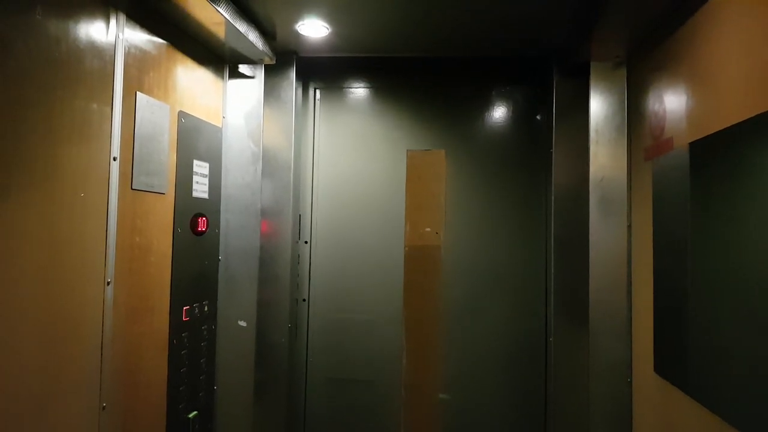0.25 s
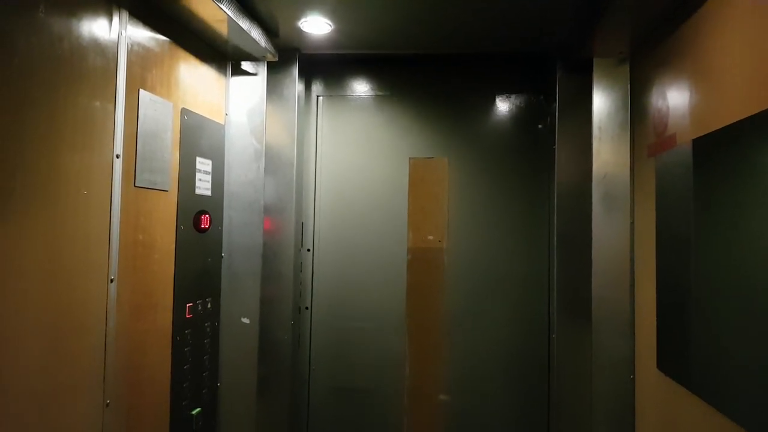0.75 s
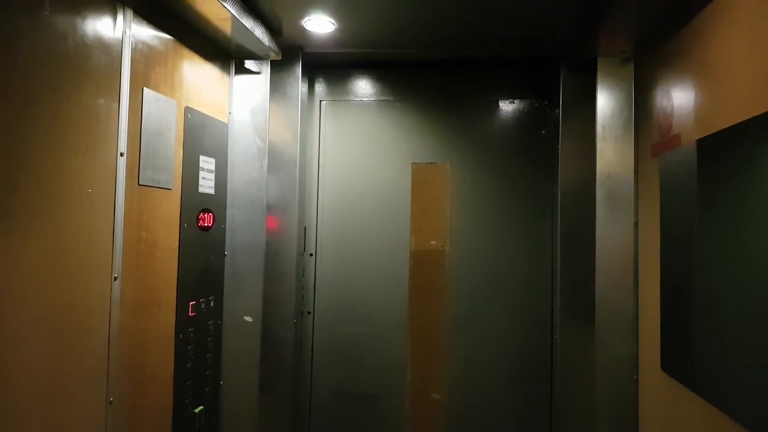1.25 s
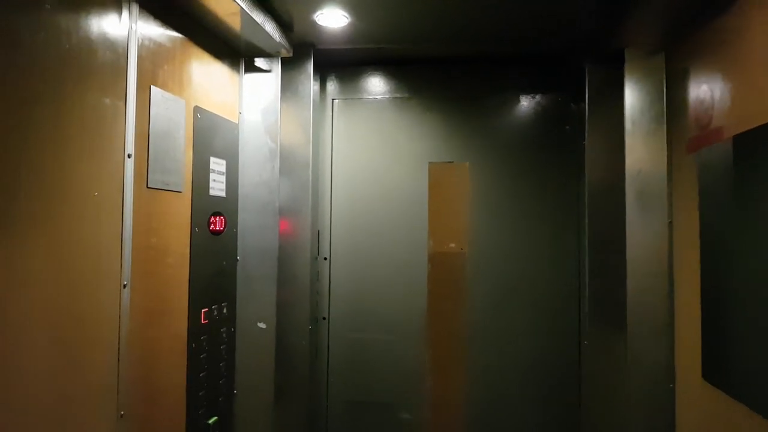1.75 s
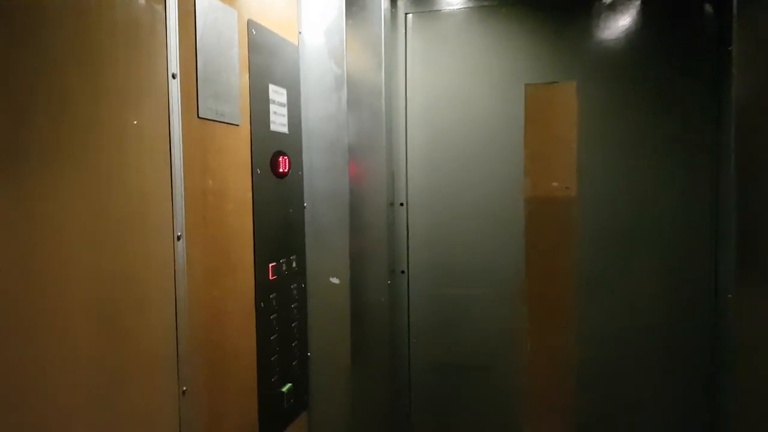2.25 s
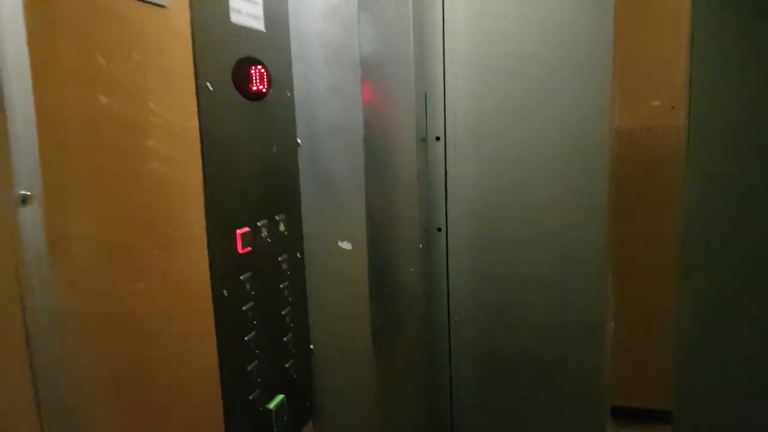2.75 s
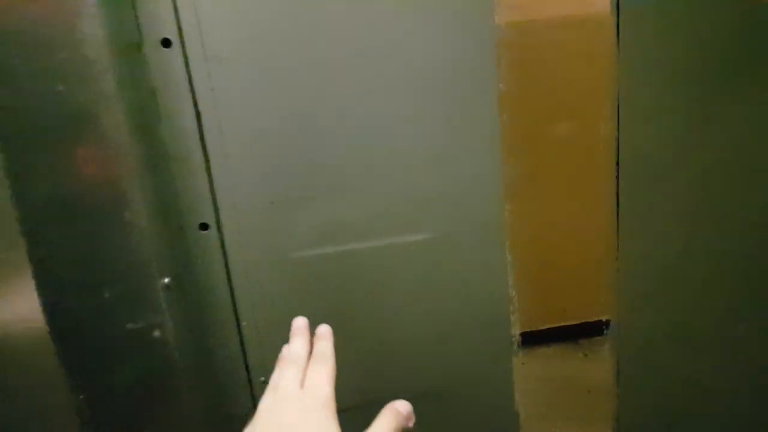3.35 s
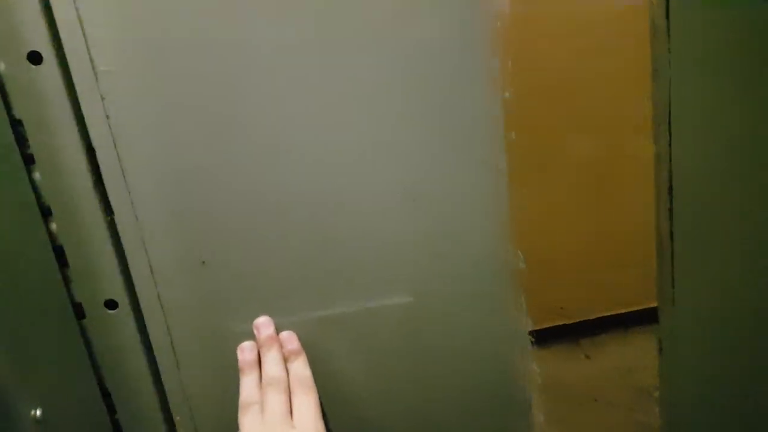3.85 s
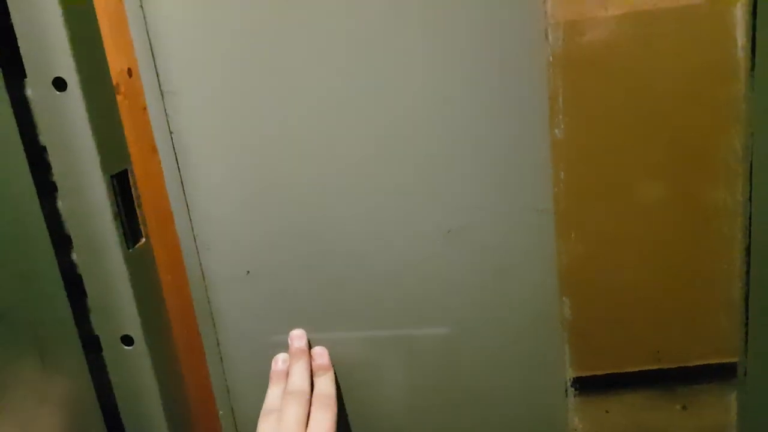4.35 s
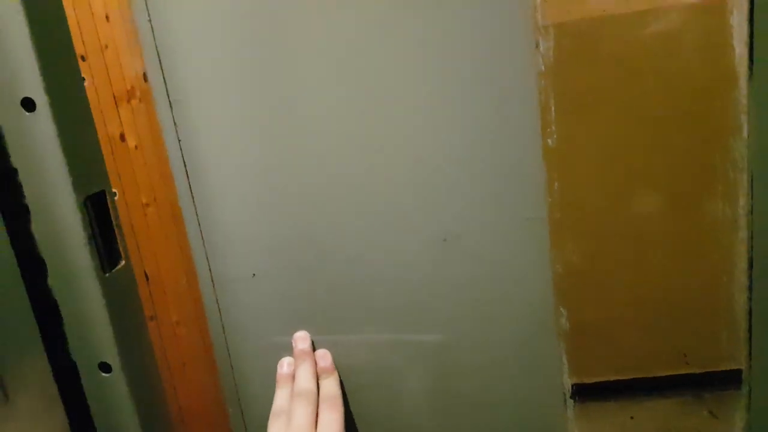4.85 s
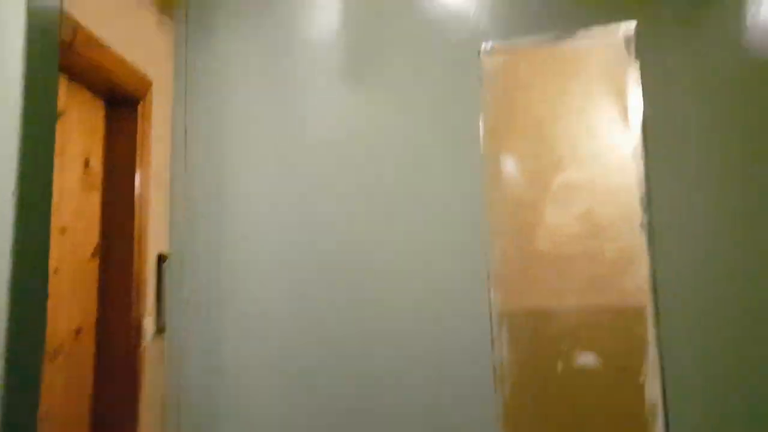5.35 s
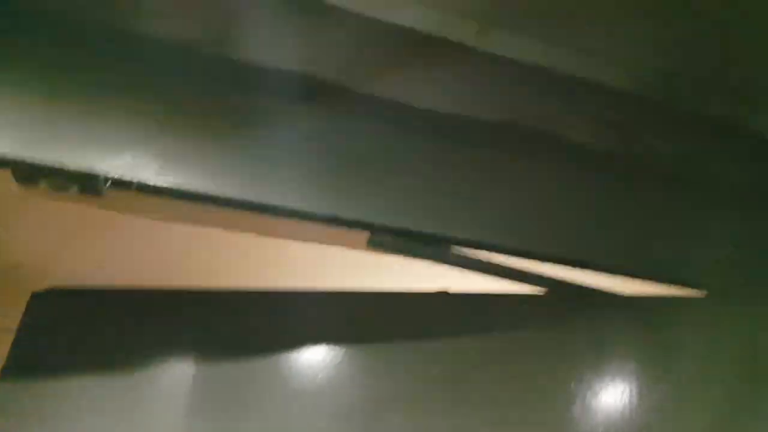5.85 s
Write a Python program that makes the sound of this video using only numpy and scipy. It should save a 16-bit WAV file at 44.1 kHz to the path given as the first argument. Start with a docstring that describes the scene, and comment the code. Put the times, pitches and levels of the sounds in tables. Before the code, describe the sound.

Heavy steps thud and shake loose lift panels, soles squeak, then a pushed steel door snaps off its latch with a hollow boom.

```python
"""The loose floor of an old lift cabin clunks under someone's steps and sets the wall panels rattling.
Soles scuff by stick and slip, and a jacket rustles as friction noise that follows the body's speed.
A hand pushes the steel swing door: its latch clicks and snaps free, the leaf booms in its plate modes,
and the hinges moan as narrow resonances. Under it all lies filtered noise: the low hum of the shaft."""
import sys
import numpy as np
from scipy import signal
from scipy.fft import rfft, irfft, next_fast_len
from scipy.io import wavfile

SR = 44100
rng = np.random.default_rng(int(sys.argv[2]) if len(sys.argv) > 2 else 0)


def to_wav(s):
    """Save 16-bit WAV."""
    ch = np.atleast_2d(s).T  # columns
    pcm = np.round(np.clip(ch, -1, 1) * 32767)  # PCM
    wavfile.write(sys.argv[1], SR, pcm.astype(np.int16))


N = 268745
TIME = np.arange(N) / SR  # s, the whole scene
TAIL = TIME[:65536]  # s, the span of one event


def amp(db):
    """Decibel law: level in dB to amplitude gain."""
    return 10 ** (np.asarray(db) / 20)


def unit(x):
    """Power normalisation: scales to rms 1."""
    return x / np.sqrt(np.mean(x ** 2) + 1e-20)


def read(points, hz):
    """Logarithmic pitch scale: interpolates a spectrum's value over log frequency."""
    f, value = np.transpose(points)
    return np.interp(np.log(hz + 1), np.log(f), value)


def level(rows):
    """Slow amplitude modulation: a dB curve over time as a gain for every sample."""
    s, db = np.transpose(rows)
    return amp(np.interp(TIME, s, db))


def add(mix, s, sound):
    """Superposition: adds a stereo sound to the mix from time s."""
    part = mix[:, max(round(s * SR), 0):][:, :sound.shape[1]]
    part += sound[:, :part.shape[1]]


def tilt(hz, slope_db):
    """Spectral slope: gain that leans by slope_db an octave about 300 Hz."""
    return amp(slope_db * np.log2(np.clip(hz, 60, 8000) / 300))


# stereo width of the field: (frequency [Hz], side over mid [dB])
SIDE_OVER_MID = [(30, -16), (70, -35), (140, -11), (280, -11.5), (550, -7.5), (1000, -1.5), (2000, 0.5),
                 (16000, 0)]
RUMBLE_HZ = 23.6  # the cabin leaks below this


def noise(size, shape, ripple_db=2.5):
    """Diffuse field: random-phase noise of gain shape(hz), nearly the same on both sides in most of the bass."""
    hz = np.fft.rfftfreq(size, 1 / SR)
    # standing waves in the small cabin ripple the response above the bass
    bumps = np.interp(hz, np.arange(1000) * 25, rng.standard_normal(1000))
    ripple = amp(ripple_db * np.clip(hz / 700, 0, 1) * bumps)
    leak = hz / np.hypot(hz, RUMBLE_HZ)
    phases = 2 * np.pi * rng.random((2, len(hz)))
    mid, side = np.exp(1j * phases) * shape(hz) * ripple * leak
    mid = irfft(mid, size)
    side = irfft(side * amp(read(SIDE_OVER_MID, hz)), size)
    return np.array([mid + side, mid - side]) / np.std(mid)


def coloured(size, spectrum, slope_db=0):
    """Spectral shaping: noise with a given spectrum and slope."""
    return noise(size, lambda hz: amp(read(spectrum, hz)) * tilt(hz, slope_db))


def resonant(size, peaks):
    """Resonance: noise held in a few narrow peaks (frequency [Hz], width [Hz], level [dB])."""
    def shape(hz):
        return sum(amp(db) / (1 + (2 * (hz - f) / width) ** 2) for f, width, db in peaks)
    return noise(size, shape)


def onset(rise):
    """Finite contact time: a quarter-sine start lasting rise seconds."""
    return np.sin(np.pi / 2 * np.minimum(TAIL / max(rise, 1e-4), 1))


def chatter(size, depth_db, per_s):
    """Random contact: the uneven gain of many small touches, per_s of them a second."""
    knots = rng.standard_normal(size)
    return unit(amp(depth_db * np.interp(np.arange(size) * per_s / SR, np.arange(size), knots)))


# decay in the cabin: (frequency [Hz], t60 at ring factor 1 [s])
CABIN_T60 = [(40, 0.69), (90, 0.73), (200, 0.69), (500, 0.45), (1500, 0.3), (4000, 0.35), (8000, 0.25),
             (15000, 0.16)]


def strike(spectrum, slope_db, ring, late_db):
    """Dense modal decay: each band of a blow dies at its own speed, and the shaft answers late."""
    hz, t, bands = signal.stft(coloured(len(TAIL), spectrum, slope_db), SR, nperseg=512)
    t60 = read(CABIN_T60, hz)[:, None] * max(ring, .05)
    early, late = amp(-60 * t / t60), amp(late_db - 60 * t / (t60 * 2.86))
    return signal.istft(bands * np.hypot(early, late), SR, nperseg=512)[1][:, :len(TAIL)]


def modes(table, slope_db=0, ring=1):
    """Modal synthesis: decaying sines, the two sides out of step most at high frequency."""
    out = np.zeros((2, len(TAIL)))
    for hz, db, t60 in table:
        side_sign = rng.choice([-1, 1]) * np.array([[1], [-1]])
        apart = np.arctan(amp(read(SIDE_OVER_MID, hz))) * side_sign
        phase = 2 * np.pi * (hz * TAIL + rng.random())
        decay = amp(db - 60 * TAIL / (t60 * ring))
        out += tilt(hz, slope_db) * decay * np.sin(phase + apart)
    return out


# weight landing on the cabin floor:
# (time [s], level [dB], rise [s], brightness [dB per octave], factor on the ring time)
FLOOR_STEPS = [(0.647, -51.5, 0.011, -15, 0.96), (1.497, -30, 0.042, -0.5, 0.91),
               (1.675, -25.5, 0.02, 4.5, 1.27), (1.931, -36.5, .016, -1, 1.4),
               (2.337, -31.5, .007, -9.5, 0.68), (2.452, -38, 0.0076, -0.5, 1.14),
               (2.705, -35, 0.0054, -4.5, 0.71), (3.015, -32, 0.0093, 0, 1.75),
               (3.335, -34, 0.0037, -8, 1.24), (3.72, -40, 0.043, -1.5, 1.4), (3.95, -31, .066, 1.5, 1.67),
               (5.039, -52.5, 0.035, 2.5, 1.4), (5.279, -50.5, .03, -5, 1.7)]
# spectrum of the thump: (frequency [Hz], level [dB])
THUMP_SPECTRUM = [(25, 1.5), (40, -4), (60, -4), (85, -2), (115, -12), (165, -9.5), (230, -17),
                  (400, -26.5), (800, -39.5), (2000, -45.5), (8000, -67)]
# the floor's modes: (frequency [Hz], level [dB], t60 at ring factor 1 [s])
FLOOR_MODES = [(38.5, -15, 0.99), (71.9, -10, .9), (86.6, -2, 1), (137.4, -8.5, 0.59)]


def floor_thuds():
    """Impact on a spring: the floor takes each step with a dull thump and rings on in its low modes."""
    out = np.zeros((2, N))
    for s, db, rise, slope_db, ring in FLOOR_STEPS:
        thump = strike(THUMP_SPECTRUM, slope_db, ring, late_db=-23)
        add(out, s, amp(db) * onset(rise) * (thump + modes(FLOOR_MODES, 0, ring)))
    return out


# knocks on the cabin panels:
# (time [s], level [dB], rise [s], brightness [dB per octave], factor on the ring time)
PANEL_KNOCKS = [(1.499, -47, 0.0013, -0.5, 1), (1.713, -18, 0.0081, 0.5, 1.08),
                (1.744, -20.5, 0.0024, 0, 0.61), (1.763, -25, 0.0032, 1.5, 0.77),
                (1.886, -35.5, .005, -0.5, 0.43), (2.525, -42.5, 0.0044, -3, .5),
                (2.71, -47.5, 0.0054, 1, 0.47), (3.016, -41.5, 0.0034, 1.5, 1.3),
                (3.347, -40, 0.003, 0.5, 0.8), (3.465, -49.5, 0.0059, 1.5, 0.79),
                (5.21, -46, 0.014, -0.5, 0.66)]
# spectrum of the rattle: (frequency [Hz], level [dB])
RATTLE_SPECTRUM = [(25, -20), (70, -0.5), (135, -4), (210, -15.5), (285, -7.5), (385, -11), (600, -15),
                   (950, -14.5), (1600, -21.5), (2400, -19), (4000, -29.5), (5500, -29), (8500, -32),
                   (10500, -40), (16000, -52)]
# panel resonances: (frequency [Hz], level [dB], t60 at ring factor 1 [s])
PANEL_MODES = [(72.7, -10, 0.8), (133, -11.5, 0.42), (158.2, -18, 0.6), (178.4, -11.5, 0.7),
               (229, -17.5, 1.65), (248.8, -16, 1.67), (289, -6.5, 0.56), (317, -14, 0.46),
               (379, 0.5, 0.26), (395.4, -2, 0.33), (471, -19, 0.63), (487, -7, 0.61), (558.4, -10, 0.57),
               (693, -16, 0.62), (846, -10, 0.42), (895, -17, 0.42), (982, -10, 0.39), (1042, -7.5, 0.28),
               (1188, -20, 0.7), (1240, -15, 0.53), (1310, -12.5, 0.35), (2170, -8, 0.3), (2720, -30, 0.3),
               (2895, -17, 0.48)]


def cabin_clunks():
    """Plate vibration: loose panels ring and chatter against their frames."""
    out = np.zeros((2, N))
    for s, db, rise, slope_db, ring in PANEL_KNOCKS:
        rattle = strike(RATTLE_SPECTRUM, slope_db, ring, late_db=-12.0)
        rattle = rattle * chatter(len(TAIL), depth_db=1.16, per_s=220)
        # the modes stand out less in strongly tilted knocks
        ringing = amp(-0.5 - 2 * abs(slope_db)) * modes(PANEL_MODES, 0, ring)
        add(out, s, amp(db) * onset(rise) * (rattle + ringing))
    return out


# soles dragging on the floor: (time [s], level [dB], swell [s], t60 [s],
# brightness [dB per octave], squeak level [dB], squeak frequency [Hz])
SOLE_DRAGS = [(1.684, -32, 0.018, 0.33, 2, -20, 2570), (2.336, -39, 0.012, 0.34, 1, -3.5, 2410),
              (2.355, -36, 0.051, 0.3, -1, -10.5, 2400), (2.917, -53, 0.022, 0.48, -2.5, -16, 2530),
              (3.017, -37.5, 0.0099, 0.41, -2, -27, 2330), (3.032, -32, 0.043, 0.37, 1, -6.5, 2100),
              (3.166, -46, 0.012, 0.17, -7, -2, 2360), (3.315, -39.5, 0.005, 0.2, 5.5, -11, 2440),
              (5.26, -51.5, 0.027, 0.18, -4, -20, 2400)]
# spectrum of the gritty friction: (frequency [Hz], level [dB])
SOLE_SPECTRUM = [(100, -14), (600, -6), (1500, -5.5), (2200, 1), (3100, -0.5), (4200, -3), (5500, -6),
                 (8000, -13), (10000, -17), (14000, -11), (16000, -16)]


def scuffs():
    """Stick-slip friction: a sole drags in uneven jerks of fine grains, with a short rough squeak."""
    out = np.zeros((2, N))
    for s, db, swell, t60, slope_db, squeak_db, hz in SOLE_DRAGS:
        grit = coloured(len(TAIL), SOLE_SPECTRUM, slope_db)
        squeak = amp(squeak_db) * resonant(len(TAIL), [(hz, 120, 0), (hz * 1.105, 160, -6)])
        jerks = chatter(len(TAIL), depth_db=0.6, per_s=144)
        decay = amp(db - 60 * np.maximum(TAIL - swell, 0) / t60)
        add(out, s, decay * onset(swell) * jerks * (grit + squeak))
    return out


# light hollow knocks: (time [s], level [dB], factor on the ring time)
HOLLOW_KNOCKS = [(3.212, -31.5, 0.37), (3.249, -37.5, 0.19), (3.348, -37, 0.45)]
# their spectrum: (frequency [Hz], level [dB])
HOLLOW_SPECTRUM = [(100, 9), (380, -4), (520, 5), (930, -3), (1250, -13), (1870, -1.5), (2300, -11),
                   (3000, -22), (8000, -34), (16000, -45)]


def knocks():
    """Damped impact: short hollow knocks in the cabin."""
    out = np.zeros((2, N))
    for s, db, ring in HOLLOW_KNOCKS:
        add(out, s, amp(db) * onset(0.00087) * strike(HOLLOW_SPECTRUM, 0, ring, late_db=-23))
    return out


# the latch bolt sliding against its stop: (time [s], level [dB])
BOLT_SLIDES = [(3.8973, -29), (3.925, -40)]
# spectrum of the grating click: (frequency [Hz], level [dB])
BOLT_SPECTRUM = [(100, -19), (450, 6.5), (750, -30), (1250, -1), (1450, -14), (1660, 5), (1900, -20),
                 (2200, 0), (2650, -13.5), (3300, -15.5), (4400, -5), (5300, -13.5), (8300, -13),
                 (11000, -16.5), (13500, -20), (16000, -33)]
# the bolt's modes: (frequency [Hz], level [dB], t60 [s])
BOLT_MODES = [(940, -17, 0.29), (1190, -4, 0.31), (1293, -5, 0.19), (1610, -5, 0.27), (2120, -13, 0.33),
              (2600, -5, 0.28), (3860, -19, .25), (4420, -12, .28), (4590, -14, 0.28), (4860, -4, 0.21),
              (6100, -8, 0.22), (7247, -13, .28), (7700, -5, 0.21), (8160, -4, 0.23), (8210, -3.5, 0.26),
              (10150, -9, 0.18)]


def bolt():
    """Friction-excited bar: the latch bolt grates against its stop and pings in its modes."""
    out = np.zeros((2, N))
    for s, db in BOLT_SLIDES:
        click = strike(BOLT_SPECTRUM, 0, ring=0.75, late_db=-15)
        click = click * chatter(len(TAIL), depth_db=-0.5, per_s=1100)
        add(out, s, amp(db) * onset(0.0014) * (amp(-0.5) * click + amp(-6) * modes(BOLT_MODES)))
    return out


# sharp ticks, from faint ones in the cabin to the latch snapping free:
# (time [s], level [dB], brightness [dB per octave], factor on the ring time, hard tick [dB])
STEEL_TICKS = [(.287, -65, 0, 0.23, -20), (0.996, -66.5, 0, 0.82, -25), (2.18, -60, 10, .4, 5),
               (3.317, -54, 5, .5, -10), (3.897, -43, 7, 0.41, 10), (4.03, -38, -10, 1.3, -12),
               (4.0752, -22.5, 0.5, 1, -2.5), (5.363, -56, 10, .4, 6)]
# spectrum of the clack: (frequency [Hz], level [dB])
CLACK_SPECTRUM = [(100, -18), (400, 9.5), (800, -1), (1200, -1.5), (1800, -2), (3200, -1.5), (4000, -11.5),
                  (6000, -14.5), (8500, -15.5), (10500, -22), (14000, -3), (16000, -14.5)]
# spectrum of the hard tick: (frequency [Hz], level [dB])
TICK_SPECTRUM = [(500, -29), (6000, -19), (11000, -19), (13500, -12), (15200, -15), (16500, 0.5)]
# the latch housing's modes: (frequency [Hz], level [dB], t60 at ring factor 1 [s])
HOUSING_MODES = [(893, -10, 0.44), (1213, -17, 0.53), (1633, -9.5, 0.43), (1750, -13, 0.49),
                 (1870, -7, 0.3), (1924, -14.5, 0.31), (2030, -36, 0.16), (2340, -27, 0.31),
                 (2520, -11, 0.29), (2607, -32, 0.39), (2870, -37, 0.25), (2750, -13, 0.27),
                 (3150, -25, 0.26), (3480, -17, 0.22)]


def catches():
    """Hard impact: steel on steel gives a brief high tick and the clack of its housing."""
    out = np.zeros((2, N))
    for s, db, slope_db, ring, tick_db in STEEL_TICKS:
        clack = strike(CLACK_SPECTRUM, slope_db, ring, late_db=-20.5)
        clack = clack * chatter(len(TAIL), depth_db=-2.0, per_s=490)
        # the tick arrives direct, then dies away between the walls
        direct, echo = amp(14 - 60 * TAIL / 0.017), amp(-10 - 60 * TAIL / 0.37)
        tick = amp(tick_db) * coloured(len(TAIL), TICK_SPECTRUM) * (direct + echo)
        housing = onset(0.0034) * (clack + amp(-4.5) * modes(HOUSING_MODES, 0, ring))
        add(out, s, amp(db) * (onset(0.00059) * tick + housing))
    return out


# blows on the door leaf:
# (time [s], level [dB], rise [s], brightness [dB per octave], factor on the ring time)
LEAF_BLOWS = [(3.80, -43, 0.056, -2, 1.1), (3.9, -30.5, 0.0052, 3.5, 0.88), (4.08, -22, 0.043, -0.8, 1.6)]
# spectrum of the boom: (frequency [Hz], level [dB])
BOOM_SPECTRUM = [(25, -26), (50, -18), (80, 5), (115, -2.5), (165, 3.5), (230, -13), (300, -7.5),
                 (400, -2.5), (520, -4.5), (650, -19), (1000, -18.5), (3000, -33.5), (9000, -80)]
# the leaf's modes: (frequency [Hz], level [dB], t60 at ring factor 1 [s])
LEAF_MODES = [(68.8, -11, 0.67), (87.3, -10, 0.86), (124.4, -14, 0.83), (159.2, -4, 0.38), (185, -3, 0.46),
              (281, -14.5, 0.58), (371, -7.5, 0.48), (389, -1.5, 0.33), (489, 0, 0.22), (587, -22, 0.4),
              (572, -14, 0.22), (697, -10.5, 0.26), (865, -19.5, 0.48)]
DENSE_RING = .8  # the leaf's crowd of dense modes dies sooner than its clear ones, by this factor
# hinge resonances: (frequency [Hz], width [Hz], level [dB])
HINGE_PEAKS = [(308, 22, 2.5), (368, 35, 1.5), (435, 10, 0), (900, 210, -11.5), (998, 49, -7.5)]
# the hinges moan while the door swings
MOAN_S, MOAN_DB, MOAN_RISE_S, MOAN_HOLD_S, MOAN_T60_S = 4.75, -55, 0.16, 0.43, 0.5


def door():
    """Plate modes and friction: the steel leaf booms around the latch's release, then its hinges moan."""
    out = np.zeros((2, N))
    for s, db, rise, slope_db, ring in LEAF_BLOWS:
        dense = amp(-2.5) * strike(BOOM_SPECTRUM, slope_db, ring * DENSE_RING, late_db=-19.5)
        add(out, s, amp(db) * onset(rise) * (dense + modes(LEAF_MODES, slope_db, ring)))
    decay = amp(MOAN_DB - 60 * np.maximum(TAIL - MOAN_HOLD_S, 0) / MOAN_T60_S)
    moan = resonant(len(TAIL), HINGE_PEAKS) * chatter(len(TAIL), depth_db=1.4, per_s=54.5)
    add(out, MOAN_S, onset(MOAN_RISE_S) * decay * moan)
    return out


def swing(s, swell, settle):
    """Kinematics: the speed of one movement builds up to its peak at time s, then settles."""
    away = (TIME - s) / np.where(TIME < s, swell, settle)
    return 1 / np.cosh(np.clip(away, -20, 20))


# movements of the body in a jacket:
# (time of peak speed [s], level [dB], swell [s], settle [s], dull rubbing over the swish [dB])
BODY_MOVES = [(.62, -76.5, .07, 0.13, 4.5), (1.58, -60.5, 0.093, 0.21, 7.5),
              (2.03, -55.5, 0.059, 0.084, 9.5), (2.62, -55, 0.22, 0.23, 4.5), (3.3, -54.5, 0.12, 0.11, 9),
              (3.48, -52, 0.11, 0.066, -0.5), (3.79, -55, 0.063, 0.084, 4), (4.02, -58, 0.091, 0.11, 11),
              (4.422, -68.5, 0.13, 0.19, 11.5), (4.88, -70.5, 0.11, 0.063, 8), (5.28, -60, 0.11, 0.21, 9),
              (5.76, -59, 0.25, 0.25, 5.5)]
# spectrum of the swish: (frequency [Hz], level [dB])
SWISH_SPECTRUM = [(300, -24), (2000, -2.5), (4000, 4), (6000, -2), (8200, -0.5), (9800, -7.5), (13000, 0),
                  (16000, -8)]
# spectrum of the dull rubbing: (frequency [Hz], level [dB])
RUB_SPECTRUM = [(60, -10), (130, 12), (250, 3.5), (450, 6), (700, 0), (1000, 0.5), (1500, -3), (2200, -1),
                (3200, -10), (6000, -19), (15000, -50)]
STIR_DB, STIR_RUB_DB = -81, -72  # the jacket's swish and rubbing while standing still


def clothes():
    """Sliding friction: a jacket swishes and rubs in step with the body's speed; powers add."""
    swish_power, rub_power = amp(STIR_DB) ** 2, amp(STIR_RUB_DB) ** 2
    for s, db, swell, settle, rub_db in BODY_MOVES:
        speed = swing(s, swell, settle)
        swish_power = swish_power + (amp(db) * speed) ** 2
        rub_power = rub_power + (amp(db + rub_db) * speed) ** 2
    swish = np.sqrt(swish_power) * coloured(N, SWISH_SPECTRUM) * chatter(N, depth_db=0.5, per_s=140)
    rub = np.sqrt(rub_power) * coloured(N, RUB_SPECTRUM) * chatter(N, depth_db=1.76, per_s=54)
    return swish + rub


# spectrum of the shaft air: (frequency [Hz], level [dB])
SHAFT_SPECTRUM = [(12, -10), (20, -1), (45, -12), (123, -12.5), (163, -23), (241, -25), (270, -29.5),
                  (367, -24), (399, -30), (434, -19.5), (472, -32), (678, -38), (825, -38.5), (3530, -59),
                  (16000, -55)]
SHAFT_DB = -58.5  # before the slow level curve
# machine hum before the slow level curve: (frequency [Hz], level [dB])
HUM_LINES = [(247.6, -75), (430.7, -79), (538.3, -81.5)]
# slow level curve of the shaft's air and hum: (time [s], level [dB])
SHAFT_LEVEL = [(0, -0.5), (.6, 0.5), (4.4, 5), (5.3, 6.5), (5.7, -7)]


def shaft():
    """Broadband and narrow-band noise: air rumbles in the shaft under a faint, wavering machine hum."""
    hum = sum(amp(db) * resonant(N, [(hz, 4, 0)]) for hz, db in HUM_LINES)
    air = amp(SHAFT_DB) * coloured(N, SHAFT_SPECTRUM)
    return level(SHAFT_LEVEL) * (air + hum)


def scene():
    """Superposition: everything heard in the cabin."""
    moving_cabin = floor_thuds() + cabin_clunks() + scuffs() + knocks()
    swing_door = bolt() + catches() + door()
    return moving_cabin + swing_door + clothes() + shaft()


# balance of the two sides: (frequency [Hz], left over right [dB])
LEFT_OVER_RIGHT = [(100, -0.6), (300, -0.5), (600, 1), (1200, 0), (2500, -2.5), (5000, -1), (8500, 9),
                   (14000, 5.5)]
EDGE_HZ = 15950  # upper band limit


def record(dry):
    """Linear filtering: the left side gets more of the top treble than the right; then the band limits."""
    size = next_fast_len(N + 4096)
    hz = np.fft.rfftfreq(size, 1 / SR)
    lean = amp(read(LEFT_OVER_RIGHT, hz))
    # the two sides keep their summed power
    sides = np.array([lean, np.ones_like(lean)]) * np.sqrt(2 / (1 + lean ** 2))
    low_cut = 1 - np.exp(-(hz / 15) ** 2)
    heard = irfft(rfft(dry, size) * sides * low_cut, size)[:, :N]
    high_cut = signal.firwin(511, EDGE_HZ, window=("kaiser", 9), fs=SR)
    return signal.oaconvolve(heard, high_cut[None], "same")


dry = scene()
out = record(dry)
to_wav(out)
```